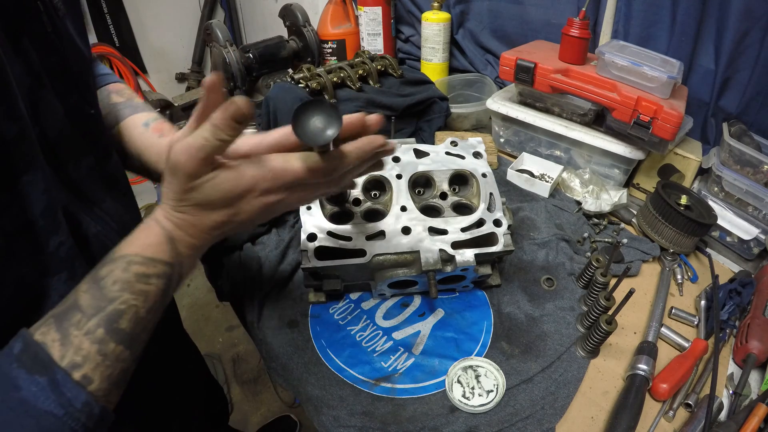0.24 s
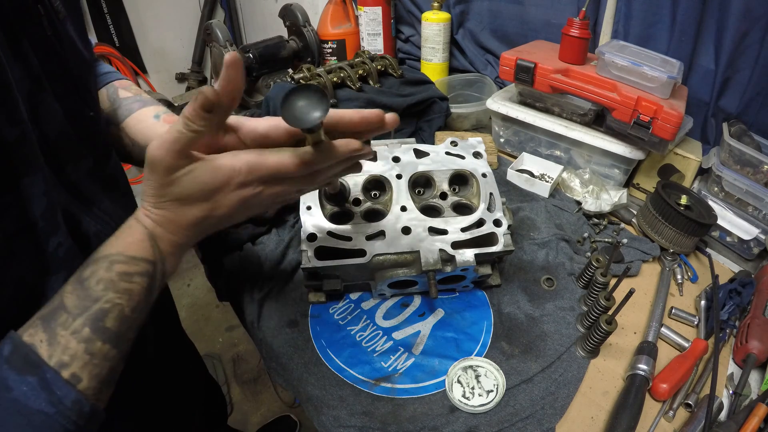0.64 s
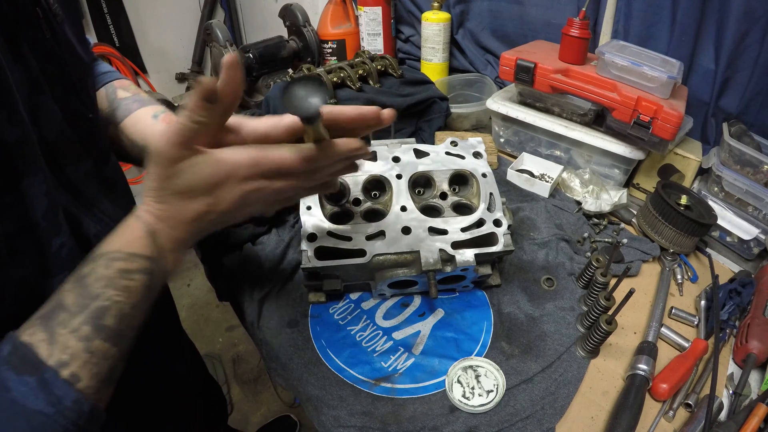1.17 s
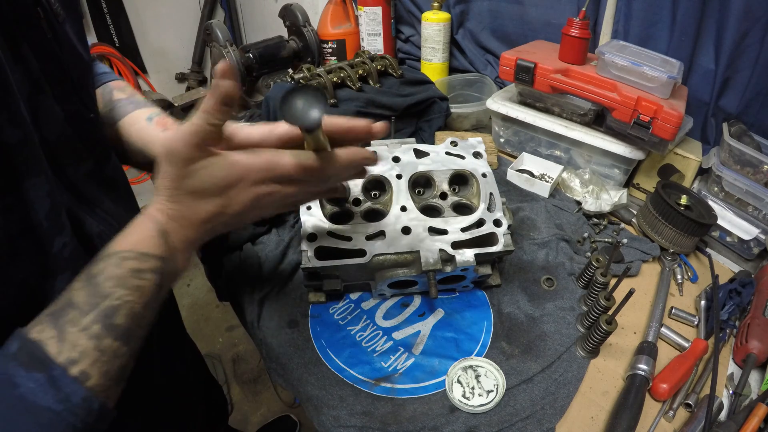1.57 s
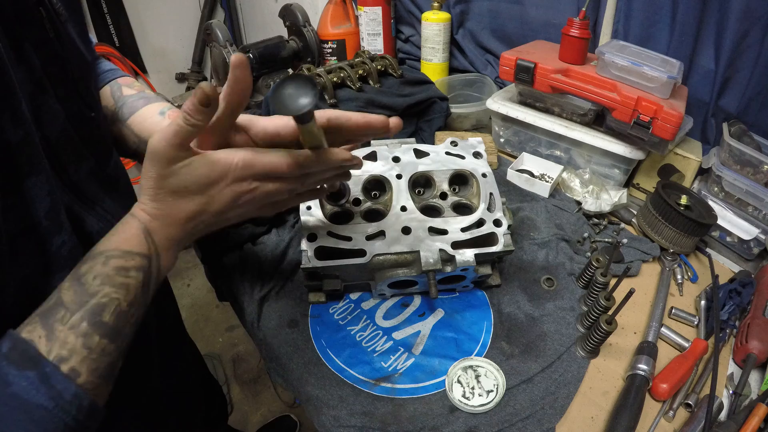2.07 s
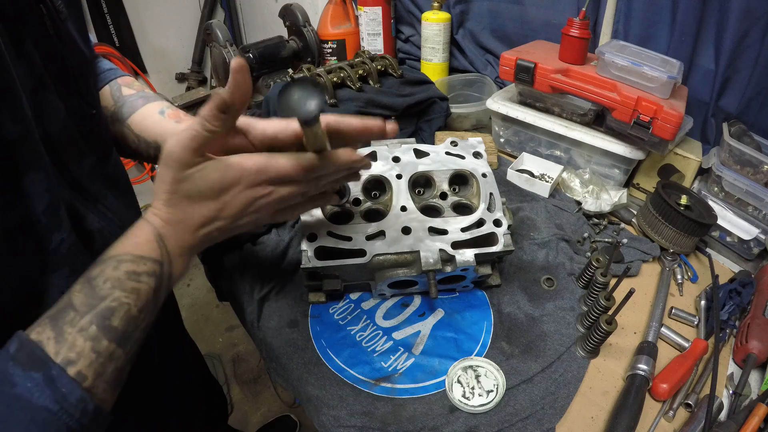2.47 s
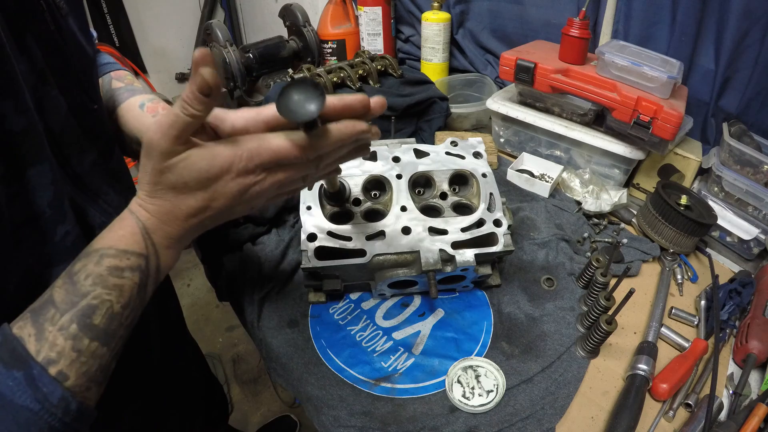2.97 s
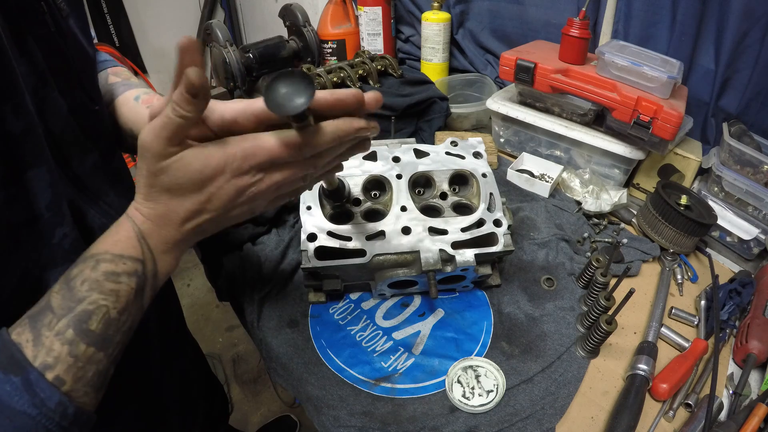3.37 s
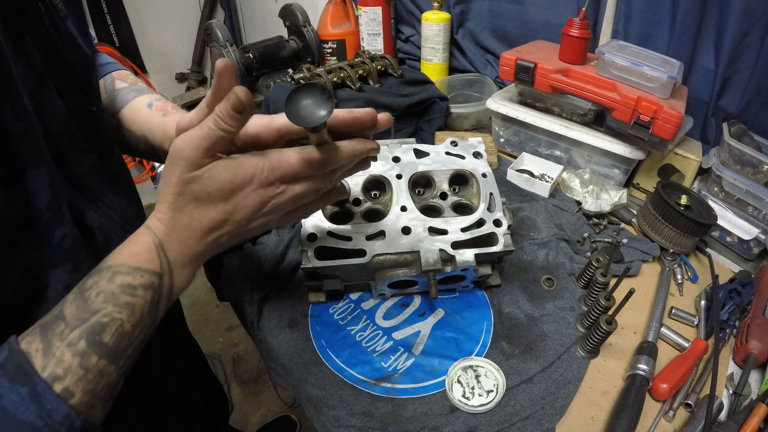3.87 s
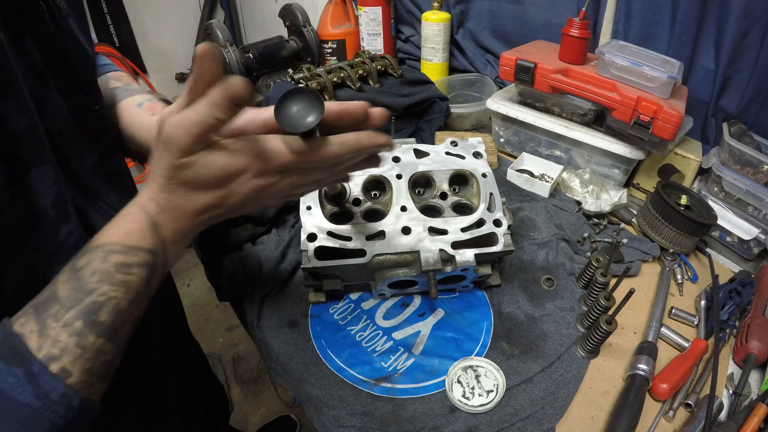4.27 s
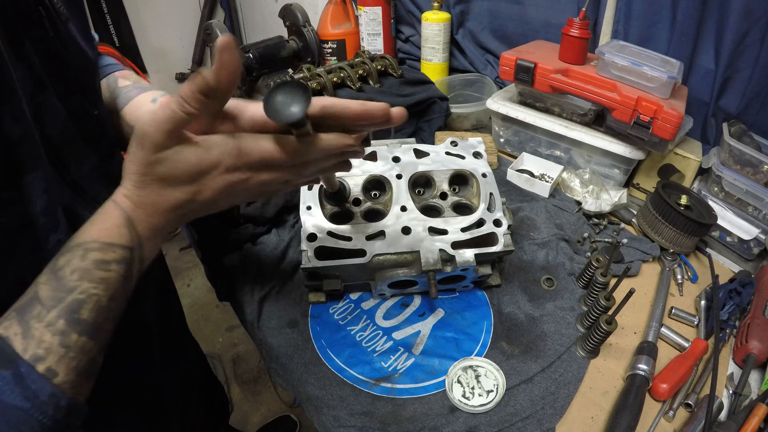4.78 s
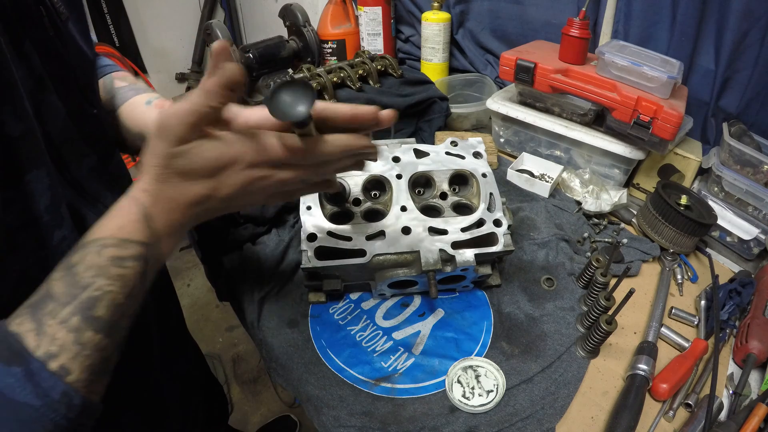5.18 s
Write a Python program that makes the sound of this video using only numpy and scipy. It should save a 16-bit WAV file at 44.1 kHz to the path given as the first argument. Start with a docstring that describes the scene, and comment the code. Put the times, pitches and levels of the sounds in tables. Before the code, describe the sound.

An engine valve is spun to and fro by hand on its gritty seat, making quick, even rasping strokes that ring lightly in an aluminium cylinder head. The grinding eases and stops. Three sharp metallic taps follow, with a faint slide of the stem, then the strokes return with a coarser crunch. The microphone is close, in a small garage with a low hum.

```python
"""An engine valve being lapped by hand, close to one microphone at a bench in a small garage.
A suction stick rolled between the palms spins the valve to and fro on its gritty seat. The valve is
lifted, tapped down three times to spread fresh compound, set back softly and ground with a coarser bite.
Grit and taps ring the same aluminium cylinder head; behind it are dull wall echoes and a low hum."""
import sys
import numpy as np
from scipy import signal
from scipy.fft import rfft, irfft, next_fast_len
from scipy.io import wavfile
from scipy.ndimage import map_coordinates

SR = 44100
rng = np.random.default_rng(int(sys.argv[2]) if len(sys.argv) > 2 else 0)


def generate_wav(sig):
    """Save sig (samples, or channels by samples) to the path in sys.argv[1] as 16-bit PCM at SR."""
    pcm = np.round(np.clip(np.atleast_2d(sig).T, -1, 1) * 32767).astype(np.int16)
    wavfile.write(sys.argv[1], SR, pcm)


N = 239327
TIME = np.arange(N) / SR
RING_TIME = np.arange(SR // 2) / SR

# Bouts of lapping, on worn paste and then on fresh. Each row: start, stop, stroke length and time lost
# getting going, all in seconds, then the coarse grit's opening level in relative dB.
BOUTS = [(-.06, 2.578, .1451, .055, -37.5), (4.256, 5.5, .15, .038, -24.6)]
# The hands bear down, then ease off before the lift.
# Each row: time in seconds, relative level of the fine grit in dB.
HAND_PRESSURE = [(0, -41.7), (.6, -39.9), (1.9, -42.1), (2.39, -43.9), (2.5, -51.7), (4.26, -43),
                 (4.5, -40.5), (5.43, -41.5)]
# Force spectra of fine grit, coarse grit, a tap and the sliding stem.
# Each row: frequency in Hz, relative level in dB.
FINE_SPECTRUM = [(100, -22), (900, -0.5), (3000, 1), (15000, 3)]
COARSE_SPECTRUM = [(100, -15.5), (450, -6), (900, 5.5), (1400, -3), (2200, -16.5), (4000, -14),
                   (9000, -37.5)]
TAP_SPECTRUM = [(100, 0), (400, -6.5), (850, 5.5), (1400, -6), (1800, -18), (2500, -16.5), (3200, -19),
                (4600, -16), (6500, -16), (8000, -19.5), (12500, -12.5), (15000, -20)]
STEM_SPECTRUM = [(500, -23), (2400, -11.5), (3000, 1), (4500, -5), (8000, -9.5), (13000, -8.5),
                 (16000, -7.5)]
# Clear modes of the head with the valve in it.
# Each row: frequency in Hz, relative level in dB, seconds to fall 60 dB.
HEAD_MODES = [(855, -4, .075), (1040, -15, .05), (1308, -16, .1), (1385, -13, .08), (1541, -13, .1),
              (1836, -9, .14), (2114, -6, .12), (2245, -3, .12), (2476, 2, .15), (2540, -1, .07),
              (2620, 0, .07), (2795, -4, .08), (2938, 5, .25), (4296, -8, .04), (4867, -12, .15),
              (5200, -2, .11), (5568, -13, .25), (6100, -7, .16), (6503, -10, .2), (7093, -4, .26),
              (7765, -13, .14), (8215, -13, .18), (9270, -14, .2), (11635, -19, .14), (12465, -20, .12),
              (15060, -24, .13)]
# The casting's crowd of quickly damped modes. Each row: frequency in Hz, relative level in dB.
CASTING_SPECTRUM = [(100, -23.5), (270, -29.5), (480, -21.5), (660, -37), (900, -21), (1200, -23),
                    (1700, -14.5), (2650, -3.5), (3250, -12), (3700, -15), (4300, -9.5), (6000, -19),
                    (8000, -22.5), (10500, -33), (15000, -31.5)]
# The valve meets its seat. Each row: start in seconds, then level, treble and bench thud in relative dB.
TAPS = [(3.28, -2, -0.5, -43.5), (3.5264, -1.5, 0, -37.5), (3.7831, -0.8, 3, -39), (4.264, -24.5, -10, -68)]
# The stem slides in its guide. Each row: centre and half length in seconds, relative level in dB.
STEM_SLIDES = [(3.12, 0.061, -61), (3.46, 0.12, -65.5), (3.69, 0.15, -64.5)]
# Echoes off the walls. Each row: delay in seconds, gain in dB.
WALL_ECHOES = [(.0262, -11), (.0885, -24)]
# The garage's reverberation. Each row: frequency in Hz, seconds to fall 60 dB.
GARAGE_DECAY = [(100, .3), (800, 0.37), (3000, 0.28), (7000, .24), (14000, 0.26)]
# Rumble and hiss of the room. Each row: frequency in Hz, relative noise density in dB.
ROOM_SPECTRUM = [(12, -25.5), (20, -7.5), (47, -3.5), (58, -5), (70, -14.5), (129, -14.5), (180, -22),
                 (213, -18.5), (266, -22.5), (465, -27.5), (505, -34), (581, -27), (1070, -32.5),
                 (4950, -37.5), (15500, -49.5)]


def grinding(wear_db_per_s=3):
    """Fine grit hisses with speed and pressure; coarse grit bites as hard when slow, only less often."""
    fine, coarse = np.zeros(N), np.zeros(N)
    pressure = amp(np.interp(TIME, *np.transpose(HAND_PRESSURE)))
    for start, stop, length, lag, coarse_db in BOUTS:
        turns = reversals(start, stop, length, lag)
        speed = stroke_speed(turns, rest=.06, skew=.8)
        grip = amp(.83 * wobble(45))
        uneven_paste = amp(.88 * wobble(22))
        fine_grains = grit(speed, peak_per_s=9000, spread_db=.5)
        hiss = pressure * grip * uneven_paste * speed ** .55 * fine_grains
        # the top treble builds later in the stroke, once the paste is dragged up to speed
        drag = stroke_speed(turns, rest=.03, skew=1.14)
        dull = lowpass(hiss, hz=5640, order=1)
        fine += dull + 1.35 * drag ** 1.1 * (hiss - dull)
        bite = amp(coarse_db - wear_db_per_s * (TIME - start))
        coarse += grip * bite * grit(speed, peak_per_s=5000, spread_db=1)
    force = amp(15) * (colour(fine, FINE_SPECTRUM) + colour(coarse, COARSE_SPECTRUM))
    return cylinder_head(force, ring_db=0, direct_db=-2.5, crowd_db=-3, crowd_t60=.047)


def reversals(start, stop, length, lag, settle_strokes=.75):
    """Times when the spin reverses: a slow start settles to an even beat; the last stroke is cut short."""
    stroke = np.arange((stop - start) / length)
    turns = start + length * stroke + lag * (1 - np.exp(-stroke / settle_strokes))
    return np.append(turns[turns < stop], stop)


def stroke_speed(turns, rest, skew):
    """Each stroke speeds up, slows and rests before reversing; a skew below 1 brings the peak earlier."""
    count = np.interp(TIME, turns, np.arange(len(turns)))
    progress = np.clip(count % 1 / (1 - rest), 0, 1) ** skew
    return np.abs(np.sin(np.pi * progress))


def grit(speed, peak_per_s, spread_db):
    """Grains crushed at random: the faster the valve turns, the more of them."""
    crushed = rng.random(N) < speed * peak_per_s / SR
    size = unit_rms(rng.standard_normal(N) * amp(spread_db * rng.standard_normal(N)))
    return crushed * size * np.sqrt(SR / peak_per_s)


def cylinder_head(force, ring_db, direct_db, crowd_db, crowd_t60):
    """The head answers a force with clear modes over a crowd of damped ones."""
    ring = np.zeros(len(RING_TIME))
    for k, (hz, db, t60) in enumerate(HEAD_MODES):
        gain = (-1) ** k * amp(db) * 2 * np.log(1000) / (t60 * SR)
        ring += gain * fade(t60) * np.sin(2 * np.pi * hz * RING_TIME)
    crowd = amp(crowd_db) * burst(crowd_t60)
    crowd[0] += amp(direct_db)  # the contact itself, heard at once
    return through(force, amp(ring_db) * ring + colour(crowd, CASTING_SPECTRUM))


def valve_taps():
    """The valve drops on its seat, crushes grit, rings the head and thumps the bench under it."""
    out = np.zeros(N)
    for start, db, treble_db, thud_db in TAPS:
        # the paste cushions the blow; its top treble comes from grains breaking just after contact
        push = lowpass(signal.unit_impulse(len(RING_TIME)), hz=6400)
        crunch = (burst(t60=.037) + amp(-6) * burst(t60=.13)) * (1 - fade(t60=.0052))
        crunch_treble = crunch - lowpass(crunch, hz=7850, order=1)
        blow = colour(push + amp(-.5) * crunch_treble, TAP_SPECTRUM)
        dull = lowpass(blow, hz=2003, order=1)
        force = amp(db + 41.5) * (dull + amp(treble_db) * (blow - dull))
        add(out, start, cylinder_head(force, ring_db=-1, direct_db=-2, crowd_db=-.5, crowd_t60=.035))
        thud = unit_rms(lowpass(rng.standard_normal(len(RING_TIME)), hz=129.8, order=3))
        add(out, start, amp(thud_db + 3) * thud * fade(t60=.38))
    return out


def valve_stem():
    """As the valve is lifted, its stem hisses faintly in the guide and stirs the head's modes."""
    level = sum(amp(db) * np.exp(-((TIME - centre) / half) ** 2) for centre, half, db in STEM_SLIDES)
    slip = level * unit_rms(colour(rng.standard_normal(N), STEM_SPECTRUM))
    ring = cylinder_head(slip, ring_db=14.5, direct_db=-9, crowd_db=-15, crowd_t60=.044)
    return amp(-.5) * slip + ring


def garage_echoes(direct):
    """A short tail and two dull wall echoes reach the microphone after the direct sound."""
    hz, t, spectra = signal.stft(rng.standard_normal(SR // 2), SR, nperseg=256)
    decay = np.exp(-np.log(1000) * t / along(GARAGE_DECAY, hz)[:, None])
    tail = signal.istft(spectra * decay, SR, nperseg=256)[1]
    out = np.zeros(N)
    add(out, .006, amp(-15.5) * through(direct, tail / np.linalg.norm(tail)))
    dull = lowpass(direct, hz=1460)
    for delay, db in WALL_ECHOES:
        add(out, delay, amp(db) * dull)
    return out


def room_tone(hum_hz=43):
    """Rumble and hiss behind the bench, with a wavering low hum and its octave."""
    air = amp(-55 + .7 * wobble(6.7)) * unit_rms(colour(rng.standard_normal(N), ROOM_SPECTRUM))
    phase = 2 * np.pi * hum_hz * TIME + .8 * wobble(6)
    hum = amp(-58 + 2.5 * wobble(6)) * np.sin(phase)
    octave = amp(-65 + 3 * wobble(7)) * np.sin(2 * phase)
    return air + hum + octave


def amp(db):
    """Decibels to gain."""
    return 10 ** (np.asarray(db) / 20)


def unit_rms(x):
    """x at rms 1."""
    return x / np.sqrt(np.mean(x ** 2) + 1e-20)


def along(points, hz):
    """Rows of frequency and value, read on a log frequency axis."""
    knots_hz, values = np.transpose(points)
    return np.interp(np.log(hz + 1), np.log(knots_hz + 1), values)


def fade(t60):
    """A decay that loses 60 dB in t60 seconds."""
    return np.exp(-np.log(1000) * RING_TIME / t60)


def burst(t60):
    """Dying noise of energy 1."""
    noise = rng.standard_normal(len(RING_TIME)) * fade(t60)
    return noise / np.linalg.norm(noise)


def through(x, response):
    """x played through an impulse response."""
    return signal.fftconvolve(x, response)[:len(x)]


def colour(x, spectrum, size=16384):
    """x through a minimum-phase filter drawn from rows of Hz and dB."""
    gain = amp(along(spectrum, np.fft.rfftfreq(size, 1 / SR)))
    cepstrum = irfft(np.log(gain))
    cepstrum[1:size // 2] *= 2
    cepstrum[size // 2 + 1:] = 0
    return through(x, irfft(np.exp(rfft(cepstrum))))


def lowpass(x, hz, order=2):
    """x rolled off above hz."""
    return signal.sosfilt(signal.butter(order, hz, fs=SR, output="sos"), x)


def wobble(knots_per_s):
    """A smooth random curve."""
    return map_coordinates(rng.standard_normal(int(N * knots_per_s / SR) + 4), [TIME * knots_per_s])


def add(track, start, sound):
    """Mix a sound into the track at start seconds."""
    part = track[round(start * SR):][:len(sound)]
    part += sound[:len(part)]


def scene():
    """The bench work close up and the garage around it, in mono."""
    work = grinding() + valve_taps() + valve_stem()
    return (work + garage_echoes(work) + room_tone())[None]


def record(dry):
    """The microphone chain rounds off the highest peaks and passes nothing above its band limit."""
    top_hz = 15350
    rounded = dry / (1 + np.abs(dry) ** 6) ** (1 / 6)
    size = next_fast_len(N + SR // 2)
    in_band = np.fft.rfftfreq(size, 1 / SR) < top_hz
    return irfft(rfft(rounded, size) * in_band, size)[:, :N]


dry = scene()
out = record(dry)
generate_wav(out)
```